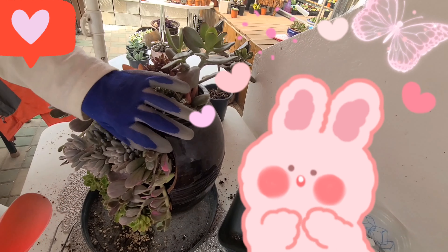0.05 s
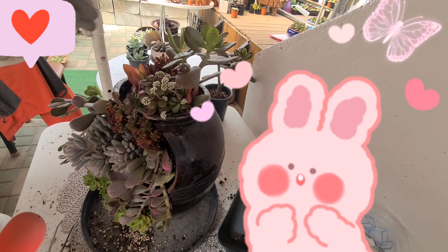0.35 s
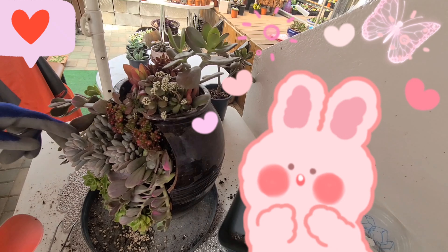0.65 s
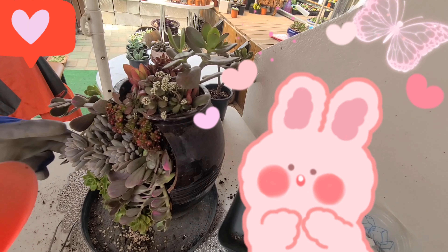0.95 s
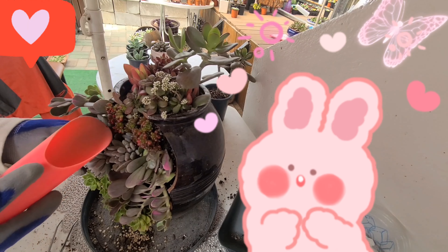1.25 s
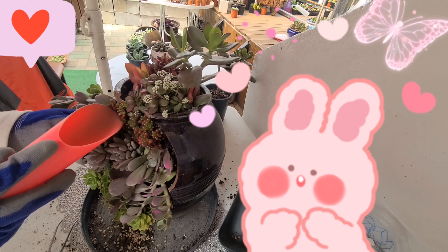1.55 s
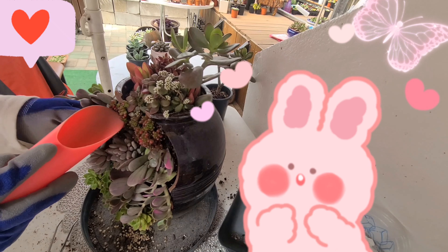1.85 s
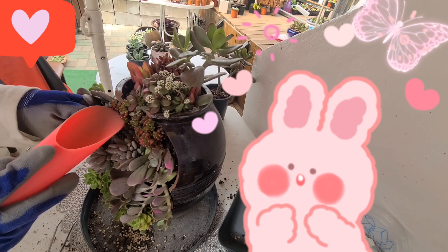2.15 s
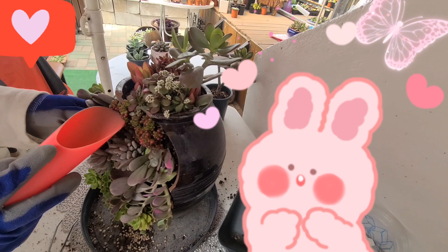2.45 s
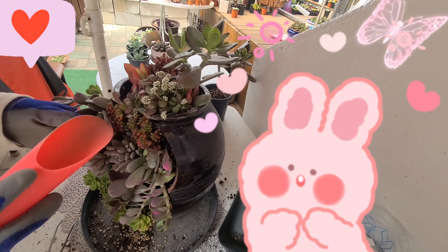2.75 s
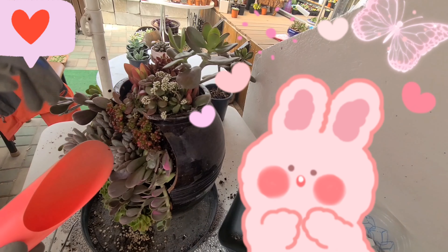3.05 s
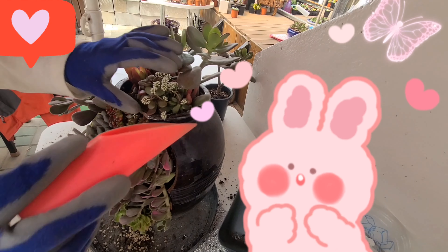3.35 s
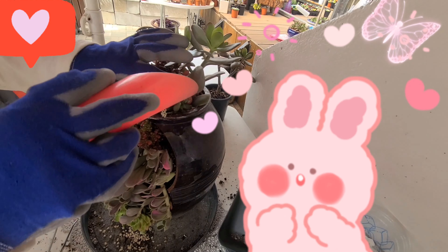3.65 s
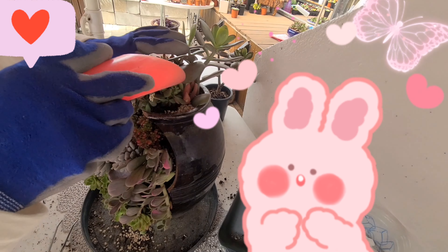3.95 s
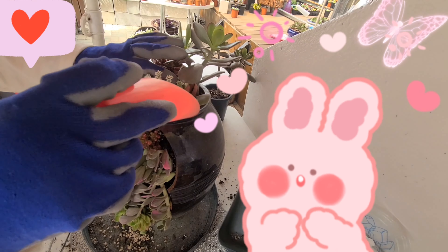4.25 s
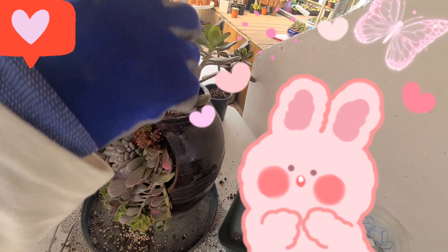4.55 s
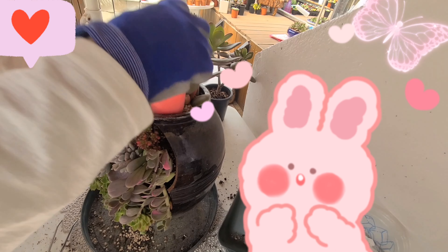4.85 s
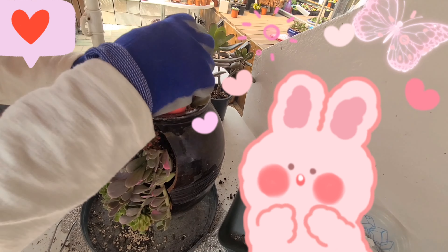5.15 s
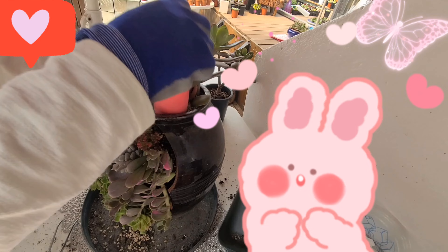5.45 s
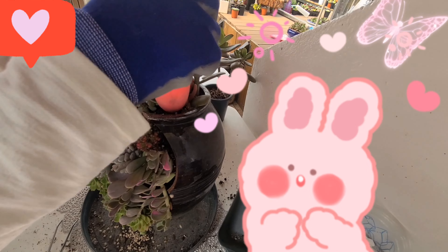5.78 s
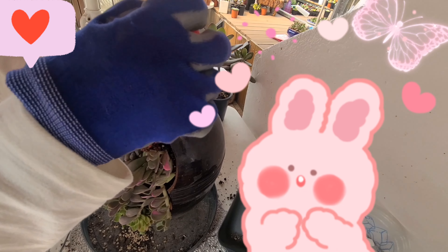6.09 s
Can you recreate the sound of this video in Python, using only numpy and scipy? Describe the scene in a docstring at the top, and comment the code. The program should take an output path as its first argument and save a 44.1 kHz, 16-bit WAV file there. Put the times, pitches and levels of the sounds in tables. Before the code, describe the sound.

A plastic scoop trickles and clicks among potted plants, then crunches into gritty soil several times over a low traffic rumble.

```python
"""Stiff leaves and grit click and a rubber glove groans as hands tend a pot of succulents under a shelter.
A plastic scoop trickles soil and knocks on the pot. Near the end it is pushed into the gritty soil
four times, each a light draw and a hard thrust, then drawn once more; the grit makes scoop and pot ring.
Distant traffic rumbles and hums beneath a faint hiss; the near walls answer clicks, knocks and soil."""
import sys
import numpy as np
from scipy import signal
from scipy.fft import rfft, irfft, next_fast_len
from scipy.io import wavfile
from scipy.ndimage import uniform_filter1d, map_coordinates

SR = 44100
rng = np.random.default_rng(int(sys.argv[2]) if len(sys.argv) > 2 else 0)


def dump_mix(stems):
    """Bounce the given channels to the path in sys.argv[1] as a 16-bit WAV at rate SR."""
    frames = np.atleast_2d(stems).T  # one column per channel
    limited = np.clip(frames, -1, 1)  # hard clip at full scale
    pcm = np.round(limited * 32767).astype(np.int16)
    wavfile.write(sys.argv[1], SR, pcm)


N = 274302

# the high notes at which scoop and pot ring: f/Hz, width/Hz, level/dB
HIGH_RINGS = [(1923, 98, -2.5), (2540, 24, -10), (2970, 68, -13), (3120, 55, -4.5), (3350, 70, -10),
              (3420, 110, -2), (4160, 150, -5.5), (4790, 110, -5), (6270, 150, 0), (6720, 80, -1.5),
              (7450, 100, -4)]


def amp(db):
    """Turn decibels into a factor to multiply by."""
    return 10 ** (np.asarray(db) / 20)


def unit(x):
    """Scale a signal to an average power of 1."""
    return x / np.sqrt(np.mean(x ** 2) + 1e-20)


def along(points, hz):
    """Read between (f/Hz, value) points, with every octave equally wide."""
    f, values = np.transpose(points)
    return np.interp(np.log(hz + 1), np.log(f), values)


def curves(rows):
    """Turn each column after the time into a curve with one value per sample."""
    times, *columns = np.transpose(rows)
    return [np.interp(np.arange(N) / SR, times, column) for column in columns]


def during(rows):
    """1 from a table's first time to its last and 0 outside, with soft edges."""
    t = np.arange(N) / SR
    return uniform_filter1d(1. * (t > rows[0][0]) * (t < rows[-1][0]), size=300)


def wobble(rate):
    """A smooth curve through `rate` random values a second."""
    return map_coordinates(rng.standard_normal(int(N * rate / SR) + 4), [np.arange(N) * rate / SR])


def gestures(rows, fall_db_per_s):
    """Two loudness curves from rows of t/s, hold/s, rise/(dB/s) and two levels/dB; the loudest row leads."""
    gains = np.zeros((2, N))
    for start, hold, rise, *db in rows:
        t = np.arange(N) / SR - start
        drop_db = rise * np.maximum(-t, 0) + fall_db_per_s * np.maximum(t - hold, 0)
        gains = np.maximum(gains, amp(db)[:, None] * amp(-np.minimum(drop_db, 200)))
    return gains


def add(track, start_s, sound):
    """Mix a sound into a track at a given time."""
    start = max(round(start_s * SR), 0)
    track[:, start:start + sound.shape[1]] += sound[:, :N - start]


def filtered(x, response):
    """Multiply each frequency in x by response(frequency)."""
    n = x.shape[-1]
    padded = next_fast_len(n + 8192)
    return irfft(rfft(x, padded) * response(np.fft.rfftfreq(padded, 1 / SR)), padded)[..., :n]


def coloured(x, spectrum, size=1024):
    """Give x a tone colour without smearing any sound ahead of a hit."""
    hz = np.fft.rfftfreq(size, 1 / SR)
    cepstrum = irfft(np.log(amp(along(spectrum, hz))))
    cepstrum[1:size // 2] *= 2  # fold the filter's early half onto its late half
    cepstrum[size // 2 + 1:] = 0
    pulse = irfft(np.exp(rfft(cepstrum)))
    return signal.fftconvolve(x, pulse[None] / np.linalg.norm(pulse), axes=1)[:, :x.shape[1]]


def resonate(x, rings):
    """Let x ring an object whose notes are rows of f/Hz, width/Hz, level/dB."""
    return filtered(x, lambda f: sum(amp(db) * 1j * f * width / (hz * hz - f * f + 1j * f * width)
                                     for hz, width, db in rings))


def spread(pair, likeness):
    """Blend two unrelated signals into left and right; likeness 1 is the same in both ears, 0 unrelated."""
    turn = lambda hz: np.arccos(np.clip(along(likeness, hz), -1, 1)) / 2
    mid, side = filtered(pair, lambda hz: np.array([np.cos(turn(hz)), np.sin(turn(hz))]))
    return unit(np.array([mid + side, mid - side]))


def rush(spectrum, likeness):
    """Steady stereo noise with a given tone colour."""
    noise = rng.standard_normal((2, N))
    return spread(filtered(noise, lambda hz: amp(along(spectrum, hz))), likeness)


def patchy(x, depth_db):
    """Narrow bands of pitch swell and fade on their own, like many far sources."""
    bands = signal.stft(x, nperseg=2048)[2]
    swells = uniform_filter1d(rng.standard_normal(bands.shape[1:]), size=3, axis=0)
    swells = unit(uniform_filter1d(swells, size=11, axis=1))
    hz = np.fft.rfftfreq(2048, 1 / SR)[:, None]
    gain = amp(depth_db * swells / (1 + (hz / 3500) ** 2))  # the treble stays steadier
    return unit(signal.istft(bands * gain, nperseg=2048)[1][:, :N])


def grains(rate, scatter_db):
    """Tiny hits of random size, about `rate` a second, at a steady average power."""
    chance = np.clip(rate / SR, 1e-4, 1)
    sizes = amp(scatter_db * np.clip(rng.standard_normal((2, N)), -2, 2))
    signs = rng.choice([-1, 1], (2, N))
    hits = rng.random((2, N)) < chance
    return unit(sizes * signs * hits / np.sqrt(chance))


def echoes(x, echo_db, count=8):
    """Pot, table and wall send back a few weak, quick copies that colour the sound."""
    out = x.copy()
    for delay, left, right in rng.random((count, 3)):
        lag = int((.002 + .016 * delay) * SR) + 1
        out[:, lag:] += amp(echo_db) * np.sign([[left - .5], [right - .5]]) * x[:, :-lag]
    return out


def walls(x):
    """The shelter answers with a blur of echoes in which low notes last longest."""
    # time the echo takes to fade by 60 dB: f/Hz, fade/s
    fade_times = [(200, 0.83), (1000, 0.12), (4000, 0.13), (14000, 0.084)]
    hz, t, bands = signal.stft(rng.standard_normal((2, SR // 3)), SR, nperseg=256)
    fade = amp(-60 * t / along(fade_times, hz)[:, None])
    tail = signal.istft(bands * fade, SR, nperseg=256)[1]
    tail = np.pad(tail, ((0, 0), (100, 0)))  # the echo arrives a moment later
    return signal.fftconvolve(x, tail / np.linalg.norm(tail[0]), axes=1)[:, :x.shape[1]]


def traffic():
    """Distant traffic makes a swelling rumble and one wavering engine note."""
    # tone colour of the rumble: f/Hz, level/dB
    rumble_colour = [(12, -49.5), (20, -32), (33, -13.5), (48, -21), (63, -0.5), (82, 0.5), (105, -6),
                     (117, -12), (127, -11), (145, -9.5), (175, -26.5), (260, -34), (500, -89)]
    # how the rumble and the engine hum swell and fade: t/s, level/dB
    rumble_levels = [(0.0, -43.5), (0.07, -36.5), (0.66, -43.5), (0.8, -33.5), (1.05, -45.5), (1.25, -37),
                     (1.52, -45.5), (1.63, -36.5), (3.07, -46), (3.72, -42), (3.88, -50.5), (3.95, -40.5),
                     (4.99, -41.5), (5.15, -33), (5.23, -41.5), (5.89, -48), (6.03, -35.5), (6.22, -39.5)]
    hum_levels = [(0.0, -60), (0.03, -39), (0.26, -55), (0.29, -29), (0.42, -44.5), (0.69, -41),
                  (0.73, -34.5), (1.11, -61), (1.16, -35.5), (1.49, -58), (1.59, -32), (1.73, -42.5),
                  (2.03, -31), (2.18, -53), (2.46, -30.5), (2.55, -44), (3.83, -51), (4.36, -41.5),
                  (5.68, -49), (5.84, -67), (5.96, -37), (6.22, -55)]
    rumble_db, = curves(rumble_levels)
    hum_db, = curves(hum_levels)
    rumble = rush(rumble_colour, likeness=[(30, 0.92), (130, 1.0), (260, 0.67)])
    deep = filtered(rumble, lambda hz: 1 / (1 + (hz / 108) ** 12))
    upper = rumble - deep
    deep /= np.sqrt(np.abs(uniform_filter1d(deep[0] ** 2, size=3000)) + 0.11)  # even out chance swells
    upper_db = -40.5 + 0.37 * (rumble_db - rumble_db.mean())  # swells less than the deep part
    engine_hz = 98.3 + 1.467 * wobble(4.8)
    hum = amp(hum_db + 2.5) * np.sin(2 * np.pi * np.cumsum(engine_hz) / SR)
    return (deep * amp(rumble_db + 1.1) + upper * amp(upper_db) + hum) * amp([[.25], [-.25]])


def open_air():
    """Open air hisses faintly and a little unevenly."""
    # tone colour of the hiss: f/Hz, level/dB
    hiss_colour = [(110, -48), (180, -5), (260, -11), (340, -1.5), (500, -4), (780, -1), (1150, -3),
                   (1500, -12.5), (2050, -15), (2600, -21.5), (5000, -24.5), (6900, -19), (7800, -31),
                   (9000, -40.5), (12000, -31), (15500, -35)]
    # how alike the hiss is in both ears: f/Hz, likeness
    hiss_likeness = [(200, 1), (640, 0.47), (1400, -0.31), (3000, -0.025), (15000, 0.14)]
    # slow drift of the hiss: t/s, level/dB
    hiss_levels = [(0, -55), (.8, -57), (2.2, -57.5), (2.8, -55.5), (3.7, -55), (4.4, -57.5), (5.8, -56),
                   (6.22, -57)]
    hiss = patchy(rush(hiss_colour, hiss_likeness), depth_db=2.5)
    hiss_db, = curves(hiss_levels)
    return hiss * amp(hiss_db + 0.48 * wobble(11))


def glove():
    """Rubber sticks and slips on the plant; every second slip differs, which adds the octave below."""
    # the groan of the dragging glove: t/s, f/Hz, level/dB
    drag = [(.36, 202.3, -61), (.38, 253, -40.5), (.397, 322, -31), (.409, 319, -60), (.423, 316, -31),
            (.44, 370, -40.5), (.46, 318, -36.5), (.485, 272, -61)]
    hz, db = curves(drag)
    phase = 2 * np.pi * np.cumsum(hz * (1 + 0.035 * wobble(99.8))) / SR
    groan = np.sin(phase) + amp(1.5) * np.sin(phase / 2) + amp(-31) * np.sin(2 * phase)
    return groan * amp(db - 2.5) * during(drag) * amp([[2.5], [-3.5]])


def knocks():
    """A blunt hit gives a dull thud and rings one short, hollow note."""
    # hand and scoop hitting pots and table: t/s, level/dB, ring f/Hz, thud level/dB
    hits = [ (0.085, -43, 1023, 1), (0.1562, -33.5, 1194, -11), (.158, -34.5, 876, 4.5),
            (.26, -42.5, 700, 1), (1.414, -40.5, 1150, -20), (1.577, -45, 282, 3.5), (2.881, -47.5, 316, 4),
            (3.743, -48, 376, 7), (4.427, -32, 1056, -3.5), (4.549, -45.5, 1077, 3),
            (4.622, -43.5, 1083, -9), (4.745, -27, 1072, 0.5), (5.339, -41, 446, 12),
            (5.581, -23, 893, -21), (5.747, -41.5, 1100, 9)]
    # tone colour of the thud: f/Hz, level/dB
    thud_colour = [(120, -12), (300, -6), (480, -3), (620, -2), (800, -8.5), (1400, -11.5), (3000, -36.5)]
    ring_fade_s, thud_fade_s = 0.06, 0.051
    track, t = np.zeros((2, N)), np.arange(SR // 3) / SR
    for start, db, hz, thud_db in hits:
        ring = amp(-60 * t / ring_fade_s) * np.sin(2 * np.pi * hz * t) * (1 - np.exp(-t / 0.0012))
        thud = coloured(rng.standard_normal((1, len(t))) * amp(-60 * t / thud_fade_s), thud_colour)
        sound = amp(db - 0.5) * (ring + amp(thud_db - 5.5) * thud) * np.ones((2, 1))
        add(track, start, sound + amp(-13.5) * walls(sound))
    return track


def clicks():
    """A sharp first touch and a few milliseconds of clatter ring the thing that was touched."""
    # clicks of leaves, grit and scoop:
    # t/s, level/dB, treble level/dB, left over right/dB, clatter length/s, ring f/Hz, ring level/dB
    touches = [ (0.0836, -34.5, -23, 4, 0.0039, 3050, -7.5), (0.156, -30.5, -6.5, 1.5, 0.0032, 1930, 0.5),
               (0.259, -31.5, -6.5, 3, .0032, 2700, 2.5), (0.373, -44, -16, 5.5, 0.0019, 3440, 6.5),
               (0.4398, -27, -2, 4, 0.0031, 3530, -9.5), (0.528, -41.5, -6, 3, .004, 3800, 1),
               (1.4108, -26.5, -18, 4, .0014, 3030, -12), (1.4138, -25.5, -0.5, -1, 0.0022, 5950, -2),
               (1.507, -37.5, -13, 1, 0.0026, 3000, -24), (1.53, -44.5, -25, 6, 0.004, 3340, -13),
               (1.793, -52, -9, 0, .003, 3180, -10), (1.978, -48.5, -12, 3, 0.0035, 3600, -18),
               (2.597, -43.5, -2, 3, .0035, 2830, -14), (2.65, -55, -18, 11, .005, 3500, -3),
               (3.513, -47.5, -8, 1, 0.011, 3950, -8), (4.4282, -30, -5.5, 0.5, 0.0023, 3080, -17),
               (4.743, -25.5, -22, -1.5, 0.0024, 2870, 0), (5.24, -31.5, -20, 5, .003, 3420, -25),
               (5.559, -22.5, -3.5, 1, 0.0066, 6400, -17), (5.748, -35, -2, -1, 0.0031, 3440, -7),
               (5.89, -54, -16, -1, 0.0012, 4530, 8), (5.944, -27.5, 1, 1, 0.013, 7230, 0.5),
               (6.022, -48, -10, 1, 0.0067, 6440, -10)]
    # tone colours of a click's snap and of its bright tick: f/Hz, level/dB
    snap_colour = [(300, -1.5), (1000, -4.5), (1800, -5), (3000, 1.5), (3900, -1), (5200, 0.5), (7400, 1.5),
                   (8700, -23), (15000, -21.5)]
    tick_colour = [(4000, -59), (7500, 10), (9000, 2), (11500, 10.5), (15500, 3.5)]
    clatter_rise_s, first_touch = 0.00074, 0.21
    track, t = np.zeros((2, N)), np.arange(SR // 3) / SR
    for start, db, treble_db, pan_db, length, ring_hz, ring_db in touches:
        force = np.exp(-t / length) * (1 - np.exp(-t / clatter_rise_s))
        clatter = rng.standard_normal((2, len(t))) * (rng.random(len(t)) < .15) * force
        blow = 1.185 * clatter / np.linalg.norm(clatter, axis=1, keepdims=True)
        blow[:, 0] += first_touch  # reaches both ears at once
        ring = resonate(blow, [(ring_hz, 0.22 * ring_hz, 0)])
        ring *= amp(ring_db) / np.linalg.norm(ring[0])
        snap = coloured(blow, snap_colour) + amp(treble_db) * coloured(blow, tick_colour) + ring
        sound = snap + walls(amp(-7) * snap + amp(-19) * ring)
        add(track, start, amp(db + 15) * sound * amp([[pan_db / 2], [-pan_db / 2]]))
    return track


def trickle():
    """Loose crumbs patter among the leaves in little clumps and faintly ring scoop and pot."""
    # crumbs sliding off the scoop, gloves brushing leaves: t/s, hold/s, patter level/dB, ring level/dB
    spills = [ (.01, 0.15, -61.5, -73), (0.274, 0.19, -58, -75), (0.444, 0.041, -50, -54.5),
              (0.496, .06, -61, -60), (.76, 0.15, -70, -80), (0.997, 0.21, -58.5, -79),
              (1.06, 0.052, -56.5, -74), (1.258, 0.21, -66.5, -85), (1.39, 0.14, -57, -76),
              (2.125, 0.021, -67.5, -78), (2.444, 0.051, -56, -83), (2.52, 0.21, -69, -73),
              (2.744, .14, -66, -81), (3.1, 0.021, -59.5, -69), (3.013, 0.96, -76, -74.5),
              (3.365, .04, -61.5, -72), (3.577, 0.021, -59, -62.5), (3.65, .02, -61, -68),
              (3.736, 0.011, -50, -69), (3.825, .07, -60.5, -89), (3.95, 0.12, -65.5, -92),
              (4.122, .02, -58.5, -73), (4.17, 0.077, -58.5, -76), (4.273, 0.15, -63, -92),
              (4.495, 0.079, -60.5, -92), (4.684, 0.077, -64.5, -74)]
    # tone colour of the patter: f/Hz, level/dB
    patter_colour = [(400, -0.5), (1200, -1.5), (3000, 1.5), (5000, -1.5), (6800, 0), (7800, -5),
                     (8800, -20), (12000, -13), (15500, -19)]
    rise_db_per_s, stray_crumbs_db = 322, -69.5
    rows = [(start, hold, rise_db_per_s, *db) for start, hold, *db in spills]
    flow, contact = gestures(rows, fall_db_per_s=254)
    flow = np.hypot(flow, amp(stray_crumbs_db))  # a few crumbs fall between the spills
    crumbs = grains(rate=1000, scatter_db=4)
    patter = unit(echoes(coloured(crumbs, patter_colour), echo_db=-8)) * flow
    ring = unit(resonate(crumbs, HIGH_RINGS[:2])) * contact
    clumps = amp(0.5 + 2.4 * wobble(45))
    sound = (patter + ring) * clumps
    return sound + amp(-10.5) * walls(sound)


def digging():
    """Grit grinds on the scoop: a harder push makes more grains slip, and they ring scoop and pot."""
    # light draws and hard thrusts in turn: t/s, hold/s, rise/(dB/s), crunch level/dB, low ring level/dB
    strokes = [ (4.765, .07, 603, -46.5, -49.5), (4.858, 0.047, 328, -31, -40.5),
               (5.016, 0.053, 382, -42, -44), (5.114, 0.021, 520, -30, -43.5),
               (5.241, 0.058, 1300, -42, -48), (5.343, 0.026, 650, -30.5, -36.5),
               (5.494, .022, 484, -37, -40), (5.578, 0.012, 703, -27.5, -33),
               (5.70, 0.036, 453, -47, -45.5)]
    # tone colour of the crunch: f/Hz, level/dB
    crunch_colour = [(200, -15), (400, -24), (1000, 0), (1600, -15), (2300, -3.5), (3300, -1.5),
                     (5000, -1.5), (6800, 0), (7700, -4.5), (8700, -13), (11000, -8), (15000, -11.5)]
    # how alike the grit is in both ears: f/Hz, likeness
    grit_likeness = [(200, 0.87), (700, 0.63), (1400, 0.38), (3100, 0.44), (7000, -0.26)]
    # the low notes at which scoop and pot ring: f/Hz, width/Hz, level/dB
    low_rings = [(475, 47, -9.5), (702, 79, -1.5), (880, 53, 1), (1035, 74, -2.5), (1283, 46, -5.5),
                 (1970, 32, -1.5)]
    moving = gestures(strokes, fall_db_per_s=481)
    settling = amp(-17) * gestures(strokes, fall_db_per_s=144)  # soil settles behind the blade
    push, press = np.maximum(moving, settling)
    grains_per_s = 1200 + 5000 * push / push.max()
    slips = amp(1.3 * wobble(130))  # the blade catches and frees itself
    grit = lambda: spread(grains(grains_per_s, scatter_db=5), grit_likeness) * slips
    stones = amp(-6.5) * grains(rate=220, scatter_db=3)
    crunch = unit(echoes(coloured(grit() + stones, crunch_colour), echo_db=-7.5)) * push * amp(2)
    high_ring = unit(resonate(grit(), HIGH_RINGS)) * push * amp(-1.6)
    low_ring = unit(resonate(grit(), low_rings)) * press * amp([[-1], [1]])
    sound = crunch + high_ring + low_ring
    return sound + amp(-26) * walls(sound)


def scene():
    """All the sounds together, left and right."""
    return digging() + trickle() + clicks() + knocks() + glove() + traffic() + open_air()


def record(dry):
    """Cut away the very highest treble."""
    top_hz = 15700
    return filtered(dry, lambda hz: 1 / (1 + (hz / top_hz) ** 120))


dry = scene()
out = record(dry)
dump_mix(out)
```